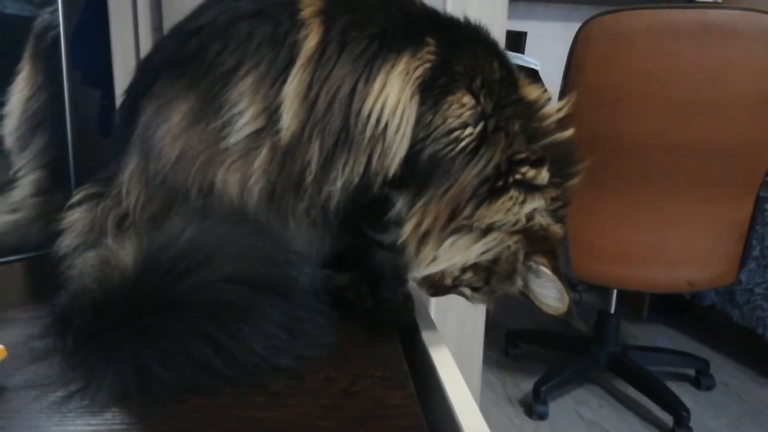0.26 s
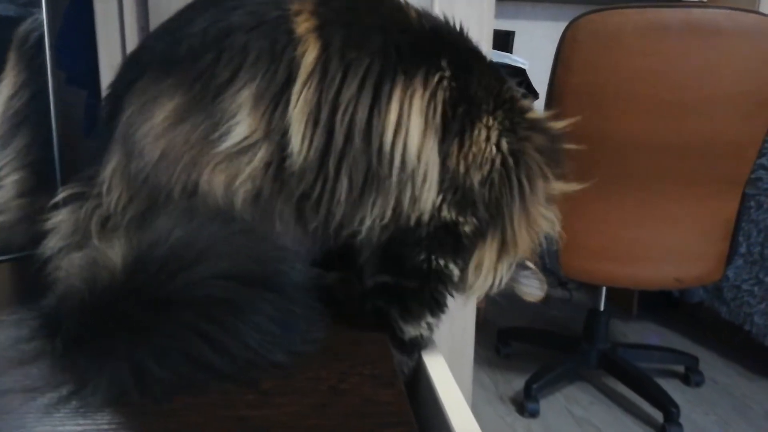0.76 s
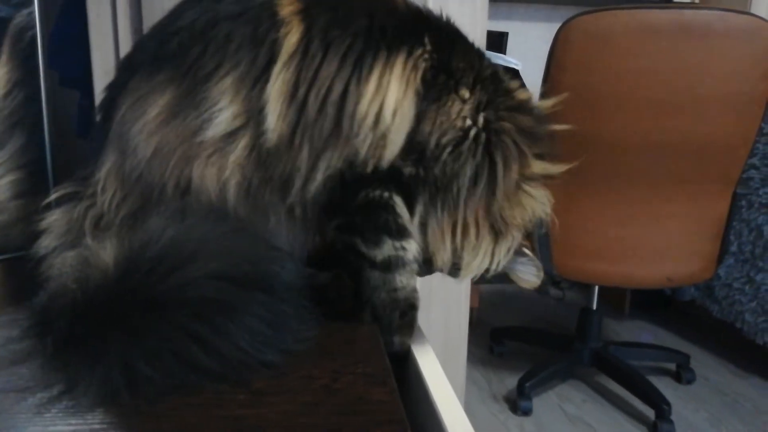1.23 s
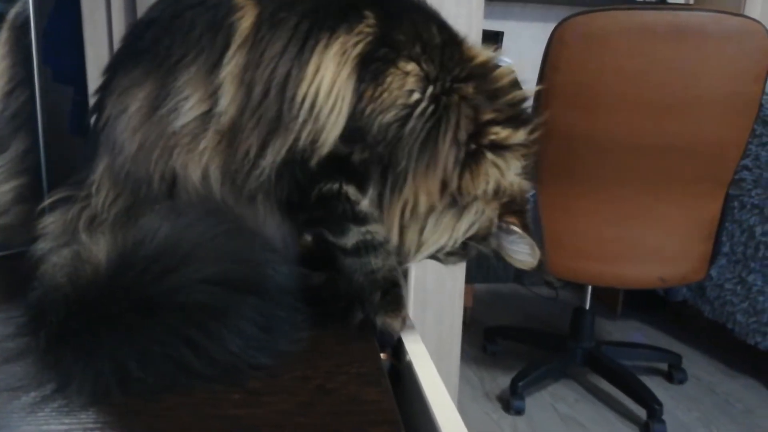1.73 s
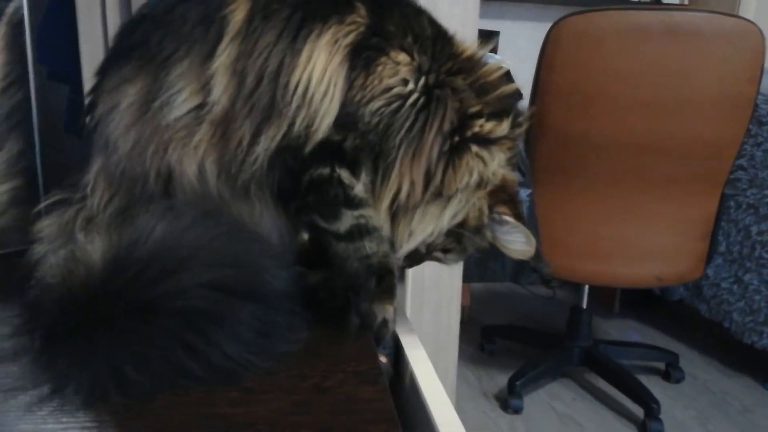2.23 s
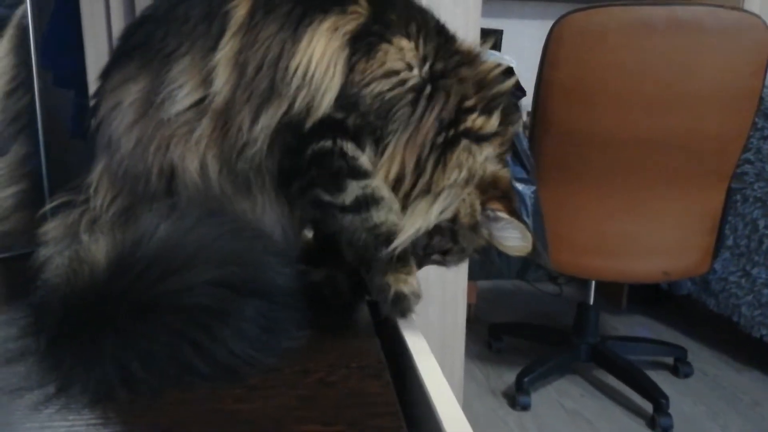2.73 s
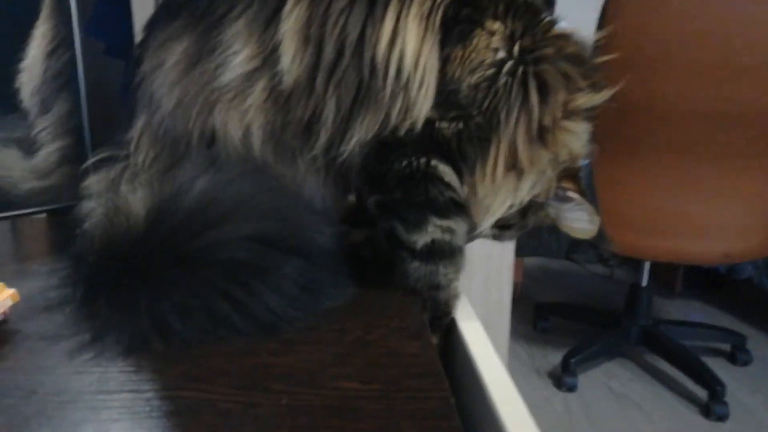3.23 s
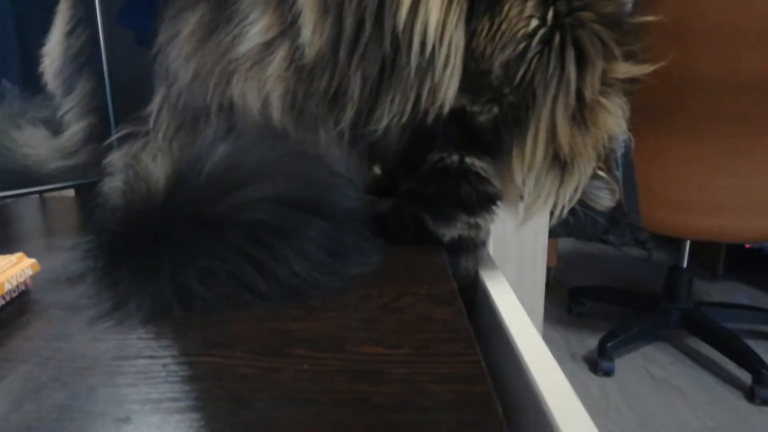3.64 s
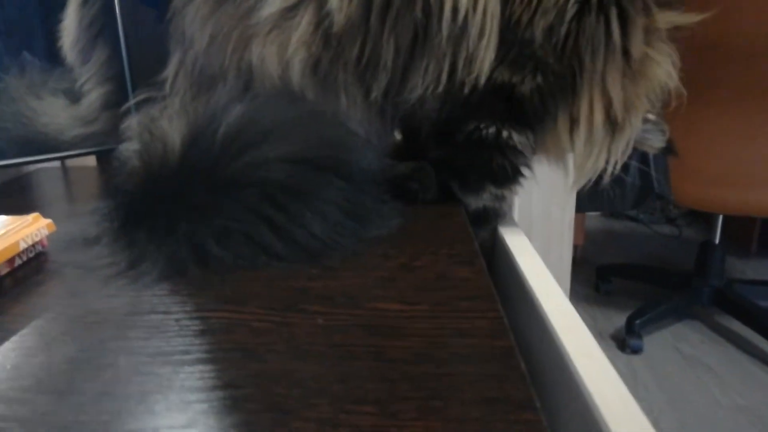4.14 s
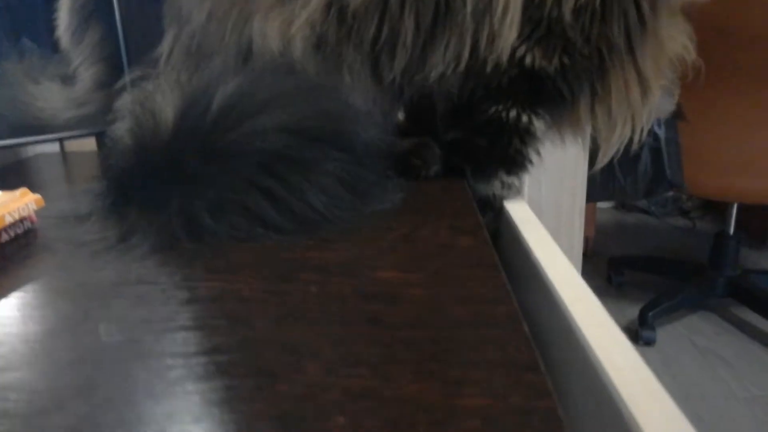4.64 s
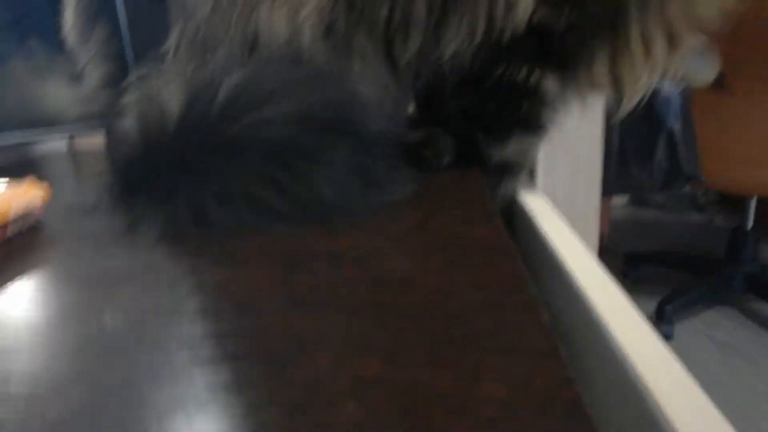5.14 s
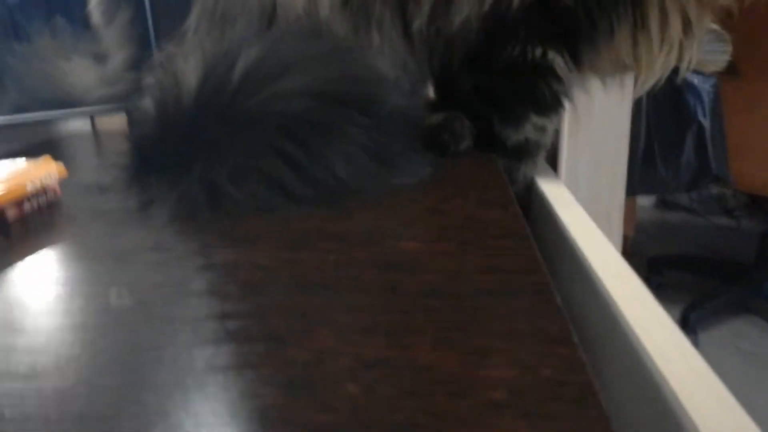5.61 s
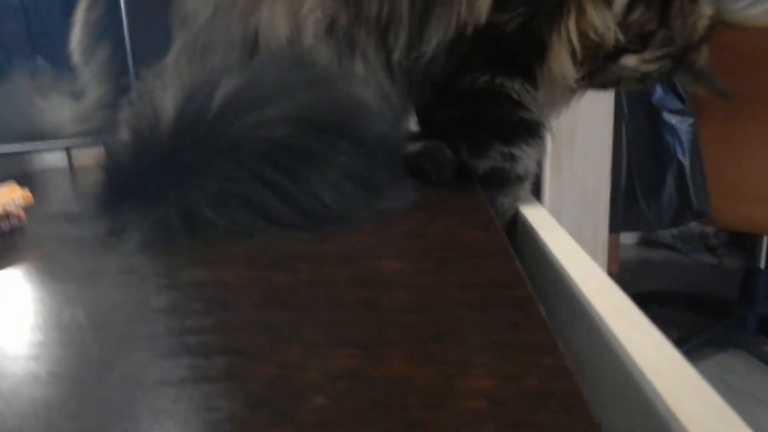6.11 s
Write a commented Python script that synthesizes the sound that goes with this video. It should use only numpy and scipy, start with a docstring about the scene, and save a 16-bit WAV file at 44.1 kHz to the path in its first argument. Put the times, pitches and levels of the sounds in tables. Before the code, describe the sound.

Close up in a small furnished room, a cat paws in a slot at a desk edge. After a near-silent start, a rapid wooden rattle breaks out, then a pause, a few isolated clacks, and a denser run of hollow knocks with soft rubbing and short scrapes. It thins to light taps. Faint hiss and low rumble lie beneath; the stereo microphone is near.

```python
"""In the narrow gap between a desk top and its drawer front, in a small furnished room, a cat bats small
hard things about. Each knock is a short chatter of contacts: decaying modes sound the wooden panels,
the hollow gap and the clacking object, and short noise bursts are the crack of the contacts. Band noise
under decaying energy makes the room's answer; coloured noise makes fur brushing wood, filtered friction
noise a dragged object, and swelling sines faint squeaks. A two-port microphone adds hiss over a low rumble."""
import sys
import numpy as np
from scipy import signal
from scipy.fft import rfft, irfft, next_fast_len
from scipy.io import wavfile

SR = 44100
rng = np.random.default_rng(int(sys.argv[2]) if len(sys.argv) > 2 else 0)


def materialize(psi):
    """Save the field psi as 16-bit PCM at rate SR to the path in sys.argv[1].

    A 1-D psi becomes a single channel; in a 2-D psi each row is a channel.
    """
    bounded = np.clip(np.atleast_2d(psi).T, -1, 1)
    quanta = np.round(bounded * 32767).astype(np.int16)
    wavfile.write(sys.argv[1], SR, quanta)


N = 280917

# modes that a knock excites, from panels to clack: pitch_hz, relative level_db, t60_s
MODES = [(62, -6.5, .2), (139.2, -6.5, 0.43), (160.7, -6.5, .2), (200.2, 4.5, 0.21), (230, 4, 0.16),
         (297, 1, 0.16), (343, -9, .1), (408, -0.5, 0.07), (481.5, -10, 0.06), (650, -2.5, 0.055),
         (823, -2.5, 0.026), (898, -0.5, 0.03), (1230, 1.5, 0.028), (1460, -4, 0.06), (1650, 7, 0.011),
         (1847, -0.5, 0.018), (2060, -4, 0.065)]
# highest pitch of the panel modes and of the hollow modes; the clack lies above: pitch_hz
PART_TOPS_HZ = [460, 1100]


def from_db(db):
    """Amplitude ratio from a logarithmic level: 20 dB are a factor of ten."""
    return 10 ** (np.asarray(db) / 20)


def rms_one(x):
    """Normalise the mean power, so that the rms is 1."""
    return x / np.sqrt(np.mean(x ** 2) + 1e-20)


def at_hz(points, hz):
    """Interpolate a spectrum linearly on a logarithmic frequency axis."""
    f, v = np.transpose(points)
    return np.interp(np.log(np.maximum(hz, 1)), np.log(np.maximum(f, 1)), v)


def drift(rate_hz):
    """Slow random modulation of rms about 1: noise through two equal low-pass poles."""
    step = 40   # samples between the slow values
    r = np.exp(-2 * np.pi * rate_hz * step / SR)
    noise = rng.standard_normal(N // step + 2002)
    slow = signal.lfilter([1], [1, -2 * r, r * r], noise)[2000:]   # the filter has settled
    return np.interp(np.arange(N) / step, np.arange(len(slow)), rms_one(slow))


def bandpass(x, low_hz, high_hz):
    """Pass one frequency band with a Butterworth response."""
    return signal.sosfilt(signal.butter(2, [low_hz, high_hz], "band", fs=SR, output="sos"), x)


def ring(drive, hz, t60):
    """Damped resonance: a unit click gives a decaying sine of height about 1, weak far below its pitch."""
    r, w = from_db(-60 / (t60 * SR)), 2 * np.pi * hz / SR
    return signal.lfilter([.5, 0, -.5], [1, -2 * r * np.cos(w), r * r], drive + 1e-18)


def bands(white, likeness):
    """Interchannel coherence: half-octave noise bands whose mid and side shares set left-right correlation."""
    edges = 22 * 2 ** np.arange(0, 9.6, .5)
    for k, (low, high) in enumerate(zip(edges, edges[1:])):
        mid, side = bandpass(white[k % 2], low, high)   # neighbours use independent noise
        hz = np.sqrt(low * high)
        alike = np.clip(at_hz(likeness, hz), -1, 1)
        yield hz, np.sqrt(1 + alike) * mid + np.sqrt(1 - alike) * side * [[1], [-1]]


def hiss(spectrum, patchy_db, rate_hz):
    """Broadband noise of a given spectral density whose bands flicker, partly together; rms 1."""
    # left-right correlation: pitch_hz, likeness
    air_likeness = [(60, .99), (130, .94), (290, .25), (640, -.35), (1400, 0)]
    white, together = rng.standard_normal((2, 2, N)), drift(rate_hz / 4)
    total = np.zeros((2, N))
    for hz, noise in bands(white, air_likeness):
        flicker_db = patchy_db * (.6 * together + drift(rate_hz))
        total += from_db(at_hz(spectrum, hz) + flicker_db) * noise
    return rms_one(total)


def rumble_and_hiss():
    """Stationary background noise: its spectral density falls from low rumble to faint hiss."""
    # relative spectral density: pitch_hz, db_per_hz
    density = [(15, -35), (25, 4), (108, 1), (185, -5), (249, -11), (363, -12), (754, -15), (1260, -15),
               (2840, -23.5), (3430, -21.5), (4250, -27), (6920, -26.5), (14800, -38), (16000, -43)]
    return from_db(-58.5) * hiss(density, patchy_db=0.46, rate_hz=8)


def room(x):
    """Statistical reverberation: the energy stored in each band builds up, decays and is heard as noise."""
    # reverberation time: pitch_hz, t60_s
    room_t60 = [(100, 0.4), (400, 0.23), (1500, 0.26), (7000, 0.28), (14000, 0.022)]
    # band level relative to the room level: pitch_hz, level_db
    room_colour = [(100, -22), (300, 1.5), (1000, -0.5), (3000, 3), (7000, -3.5), (14000, -13.5)]
    # left-right correlation: pitch_hz, likeness
    room_likeness = [(150, 1), (400, -0.091), (800, 0.4), (2000, -0.023)]
    room_db, onset_s = -6.5, 0.001   # onset is a time constant
    out, rise = np.zeros((2, N)), np.exp(-1 / (onset_s * SR))
    for hz, noise in bands(rng.standard_normal((2, 2, N)), room_likeness):
        if hz < 150:   # no reflections in the deepest bands
            continue
        power = bandpass(x, hz * 2 ** -.25, hz * 2 ** .25) ** 2
        fade = from_db(-120 / (at_hz(room_t60, hz) * SR))   # power falls twice as fast in amplitude dB
        build_and_decay = np.convolve([1, -fade], [1, -rise])
        stored = signal.lfilter([(1 - fade) * (1 - rise)], build_and_decay, power + 1e-24)
        level = from_db(room_db + at_hz(room_colour, hz))
        out += level * np.sqrt(np.abs(stored)) * rms_one(noise)
    return out


def reflections(x):
    """Reverberation with uneven tails, to which the port cavity adds its own resonance."""
    # port cavity: pitch_hz, level_db, t60_s
    port_ring = (6500, 0, 0.0066)
    tail = room(x) * from_db(1.5 * drift(57))
    hz, level_db, t60 = port_ring
    unit_gain = 2 * np.log(1000) / (t60 * SR)   # the resonance has gain 1 on top at 0 dB
    return tail + from_db(level_db) * ring(tail, hz, t60) * unit_gain


def fur(level_db):
    """Brushing friction: fur on wood is flickering noise shaped by its spectral density."""
    # relative spectral density: pitch_hz, db_per_hz
    fur_colour = [(1500, -13), (2500, -6), (3500, 8), (5000, -3.5), (7000, 6.5), (10000, -12.5),
                  (15000, -21)]
    return from_db(level_db) * hiss(fur_colour, patchy_db=1.0, rate_hz=14)


def slide(level_db):
    """Sliding friction: fluctuating noise, independent left and right, drives the dragged object's modes."""
    # dragged object: pitch_hz, relative level_db, t60_s
    slide_rings = [(1170, -7, 0.13), (1400, -2.5, .02), (1640, -0.5, .03), (1790, -8.5, 0.018)]
    friction = rng.standard_normal((2, N)) * from_db(2.0 * drift(23))
    total = np.zeros((2, N))
    for hz, mode_db, t60 in slide_rings:
        total += from_db(mode_db) * rms_one(ring(friction, hz, t60))
    return from_db(level_db) * rms_one(total)


def squeaks():
    """Amplitude and phase modulation: faint thin tones swell and fade, slightly unsteady."""
    # tones: start_s, end_s, pitch_hz, nominal level_db at the top of the swell
    tones = [(1.882, 2.03, 903, -64), (5.377, 5.448, 1320, -51.5), (6.023, 6.13, 2430, -72.5)]
    t, out = np.arange(N) / SR, np.zeros(N)
    for start, end, hz, level_db in tones:
        swell = np.sin(np.pi * np.clip((t - start) / (end - start), 0, 1))
        tone = np.sin(2 * np.pi * hz * t + .5 * drift(15))
        out += from_db(level_db + 2.0 * drift(30)) * swell * tone
    return out


def rubbing():
    """Friction of a paw moving on wood: level curves govern the fur and the dragged object."""
    # level curves: time_s, fur_db, slide_db
    rub = [(0, -60, -73), (.1, -79, -69.5), (.5, -69, -72.5), (.8, -81, -87.5), (1.4, -64.5, -73),
           (1.7, -80.5, -69.5), (2.03, -100, -65), (2.3, -93.5, -77.5), (3.6, -81, -76.5),
           (3.81, -61.5, -57.5), (3.962, -76, -65.5), (4.04, -82, -82), (4.3, -78.5, -74), (4.4, -67, -72),
           (4.72, -61.5, -67.5), (4.81, -70, -70), (4.9, -74, -67), (5.3, -74.5, -66), (5.41, -62.5, -54.5),
           (5.75, -90, -90.5), (6.37, -82.5, -73)]
    s, fur_db, slide_db = np.transpose(rub)
    t = np.arange(N) / SR
    return fur(np.interp(t, s, fur_db)) + slide(np.interp(t, s, slide_db)) + squeaks()


def strikes(at, sizes):
    """Impulsive excitation: click trains with a level difference between the two sides."""
    pan_db = 0.5   # left minus right
    clicks = np.zeros((2, N))
    np.add.at(clicks[0], at, sizes * from_db(pan_db / 2))
    np.add.at(clicks[1], at, sizes * from_db(-pan_db / 2))
    return clicks


def chatter(start_s):
    """Repeated impact: every knock is a few contacts within milliseconds, of unit total energy."""
    contacts, spread_s = 9, .0017   # spread is the mean lag before the earliest becomes zero
    lags = spread_s * rng.gamma(2, .5, (len(start_s), contacts))
    lags -= lags.min(axis=1, keepdims=True)
    at = np.minimum(((start_s[:, None] + lags) * SR).astype(int), N - 1)
    touch = rng.standard_normal(at.shape) * np.minimum(0.39 + lags / spread_s, 1)   # the first is light
    return at, touch / np.linalg.norm(touch, axis=1, keepdims=True)


def panel_thump(at, thump_db, chance_db):
    """Modal excitation of slow panels: one soft push per knock, low-passed, rings the low modes."""
    rise_hz = 140
    panels = np.zeros(N)
    for k, (hz, mode_db, t60) in enumerate(MODES):
        if np.searchsorted(PART_TOPS_HZ, hz) > 0:
            continue
        undo_softening = 1 + (hz / rise_hz) ** 2   # the low-pass below costs this much at the mode
        push = np.zeros(N)
        push[at.min(axis=1)] = from_db(thump_db + mode_db + 2 * chance_db[:, k]) * (-1) ** k * undo_softening
        panels += ring(push, hz, t60)
    r = np.exp(-2 * np.pi * rise_hz / SR)
    return signal.lfilter([(1 - r) ** 2], [1, -2 * r, r * r], panels)


def hollow_and_clack(at, touch, colour_db, chance_db, clack_db, clack_hz, hollow_hz):
    """Selective modal excitation: gap and object ring most in the modes near each knock's pitches."""
    hollow_fall_db = 22.5   # loss per octave off the hollow pitch
    clack_fall_db = 32.5 - .4 * (clack_db + 33)   # the same for the clack; less for a hard blow
    skirt = 1.595   # frequency ratio from a mode to its band edges
    gap = np.zeros((2, N))
    for k, (hz, mode_db, t60) in enumerate(MODES):
        part = np.searchsorted(PART_TOPS_HZ, hz)
        if part == 0:
            continue
        db = colour_db[part] + mode_db + chance_db[:, k]
        if part == 1:
            db = db - hollow_fall_db * np.abs(np.log2(hz / hollow_hz))
        else:
            db = db - clack_fall_db * np.abs(np.log2(hz / clack_hz))
        # contacts interfere at the mode's pitch; half of that change in dB is made good
        summed = np.abs(np.sum(touch * np.exp(-2j * np.pi * hz * at / SR), axis=1))
        sizes = touch * (from_db(db) / np.sqrt(summed))[:, None]
        rung = ring(strikes(at, sizes), hz, t60)
        gap += signal.lfilter(*signal.butter(1, [hz / skirt, hz * skirt], "band", fs=SR), rung)
    soft_contact = signal.butter(4, 2410, fs=SR, output="sos")   # soft contacts lack treble
    return signal.sosfilt(soft_contact, gap)


def crack(at, touch, lower_db, upper_db):
    """Overdamped impact noise: each contact bursts into decaying noise, too damped to ring."""
    # noise bands: low_hz, high_hz, relative level_db
    crack_bands = [(2400, 3100, -6), (3100, 4100, 0.5), (4428, 5200, 0), (5255, 5700, 3), (7006, 7700, 3),
                   (7190, 8930, 1.5), (9000, 11500, -19.5), (11500, 12000, -20.5)]
    t60_s = 0.01
    white, fade = rng.standard_normal(N), from_db(-60 / (t60_s * SR))
    out = np.zeros((2, N))
    for low, high, band_db in crack_bands:
        db = (lower_db if low < 4600 else upper_db) + band_db
        clicks = strikes(at, np.abs(touch) * from_db(db)[:, None])
        burst = white * signal.lfilter([1], [1, -fade], clicks + 1e-18)
        out += bandpass(burst, low, high)
    return out


def knocks():
    """Impact sound: the same contacts excite panels, hollow gap, object and crack; panels return apart."""
    # start_s, clack_db, clack_hz, thump_db, hollow_db, hollow_hz, hardness_db
    # thump, hollow and hardness are relative to the clack; all levels precede the part levels below
    knock_list = [(0.818, -50.5, 1170, -2.5, -9, 820, -20.5), (0.935, -31, 1640, -13.5, -13, 890, -12.5),
                  (0.958, -34.5, 1730, -8.5, -1.5, 770, -9.5), (0.997, -41.5, 1950, -11, -8, 820, -9),
                  (1.0608, -25.5, 1770, -10, -11.5, 850, -7.5), (1.1096, -47, 1680, -14, -2, 820, -7),
                  (1.129, -35.5, 1750, -20, -17, 820, -18), (1.144, -19.5, 1660, -20, -11.5, 630, -7),
                  (1.1693, -17.5, 1280, -17, -21.5, 900, -9), (1.1881, -26.5, 1270, -13, -16, 826, -22),
                  (1.2547, -34, 1690, -8.5, -5, 810, -12), (1.288, -45, 1620, -10, -5, 820, -1),
                  (1.3137, -32, 1950, -17.5, 1.5, 835, -22), (2.083, -27.5, 1840, -5.5, -4, 650, -12.5),
                  (2.1066, -28.5, 1270, -11.5, -9, 650, -9), (2.162, -33.5, 1460, -12.5, -11, 890, -16),
                  (2.6759, -34.5, 1390, -6.5, -11, 664, -8.5), (2.7635, -14.5, 1400, -9, -11.5, 970, -3),
                  (2.9051, -30.5, 2130, -13.5, -7, 720, -15), (3.011, -37.5, 1670, -22, -8, 810, -26),
                  (3.021, -33, 1390, -15.5, -14, 840, -15), (3.056, -51.5, 1410, 0.5, -15, 820, -21),
                  (3.099, -48.5, 1400, -7.5, -25, 820, -27), (3.2659, -37.5, 1600, -24.5, 4, 835, -24),
                  (3.274, -32, 1630, -14, -16, 820, -23), (3.281, -32, 1420, -15.5, -2, 820, -11),
                  (3.331, -42.5, 1460, -7, -8, 900, -9), (3.435, -31, 1670, -32, -15, 830, -15.5),
                  (3.4736, -27, 2130, -18.5, -9.5, 870, -13), (3.551, -17, 1650, -15.5, -20, 920, -4),
                  (3.595, -35, 1810, -29, -5, 810, -24), (3.6044, -15, 1585, -17, -9, 840, -9.5),
                  (3.7185, -35, 1730, -9, -2, 510, -20), (3.7602, -39, 1980, -11.5, -9, 834, -27),
                  (3.9717, -39, 1280, -21, -9, 830, -16), (3.9914, -38, 1616, -18, -8, 910, -9),
                  (4.1179, -40, 1680, -30, -30.5, 820, -15), (4.136, -20.5, 1820, -41.5, -14.5, 895, -16),
                  (4.4664, -26, 1660, -16, -14, 660, -7.5), (4.566, -23, 1790, -8, -6, 910, -9),
                  (4.643, -32, 1460, -16, 2, 850, -13.5), (4.748, -43.5, 1340, -1, -2.5, 660, -14),
                  (4.8681, -32.5, 1485, -9, 4, 614, -17.5), (5.058, -50, 1300, 4, 0, 662, -18),
                  (5.2011, -43.5, 1730, -10, -11, 820, -12.5), (5.221, -31.5, 1730, -13.5, -21, 890, -18.5),
                  (5.257, -22.5, 1430, -8.5, -2.5, 820, -7), (5.3662, -44, 2100, -9, -16, 820, -22),
                  (5.434, -13, 1475, -11.5, -9, 880, -13), (5.5023, -35.5, 1180, -9.5, -5, 940, -18),
                  (5.5393, -49.5, 1440, -1, 3.5, 820, -8), (5.6247, -35.5, 1230, -13, -6, 910, -23.5),
                  (6.1732, -46.5, 1230, -18.5, -10.5, 900, -18.5), (6.301, -33.5, 1364, -17, -2, 926, -24)]
    # one level_db each for panel, hollow, clack, lower crack and upper crack
    part_db = [-3.5, 4.5, -1, 12, 15.5]
    start_s, clack_db, clack_hz, thump_db, hollow_db, hollow_hz, hard_db = np.transpose(knock_list)
    upper_db = 1.317 * hard_db   # hard contacts are brighter
    relative_db = np.array([thump_db, hollow_db, 0 * start_s, hard_db, upper_db])
    colour_db = clack_db + relative_db + np.array(part_db)[:, None]
    chance_db = rng.normal(0, 1.5, (len(start_s), len(MODES)))
    at, touch = chatter(start_s)
    panels = panel_thump(at, colour_db[0], chance_db)
    gap = hollow_and_clack(at, touch, colour_db, chance_db, clack_db, clack_hz, hollow_hz)
    return panels, gap + crack(at, touch, colour_db[3], colour_db[4])


def ports(x):
    """Near-field diffraction: the two microphone ports differ in phase and shading at each frequency."""
    # phase by which the left port leads: pitch_hz, lead_rad
    port_phase = [(60, .2), (125, .4), (250, .9), (780, 1.2), (1900, .2), (3300, 1.0), (4900, 2.6),
                  (7200, 3.7), (8700, 3.9), (10500, 5.6)]
    # left minus right: pitch_hz, balance_db
    port_balance = [(300, 0.5), (700, 4.5), (1500, 9.5), (3000, 1), (5000, -10.5), (8000, -9.5), (12000, 3)]
    size = next_fast_len(N + 2048)
    hz = np.arange(size // 2 + 1) * SR / size
    half = from_db(at_hz(port_balance, hz) / 2) * np.exp(.5j * at_hz(port_phase, hz))
    return irfft(rfft(x, size) * np.array([half, 1 / half]), size)[:, :N]


def scene():
    """Superposition of direct knocks, their reflections, rubbing and background noise."""
    panels, gap = knocks()
    tail = reflections(gap.mean(axis=0) + panels)
    return ports(gap + panels) + tail + rubbing() + rumble_and_hiss()


def record(dry):
    """Band limiting and saturation: deep bass is dropped, peaks are rounded, the top is cut steeply."""
    dry = signal.sosfilt(signal.butter(2, 46, "high", fs=SR, output="sos"), dry)
    rounded = np.tanh(dry / 1.05) * 1.05
    return signal.sosfilt(signal.ellip(12, .5, 90, 15900, fs=SR, output="sos"), rounded)


dry = scene()
out = record(dry)
materialize(out)
```